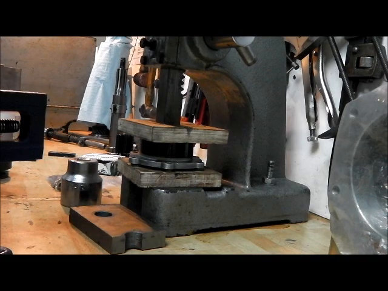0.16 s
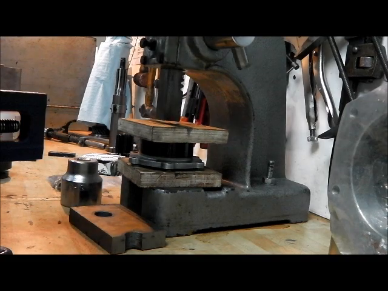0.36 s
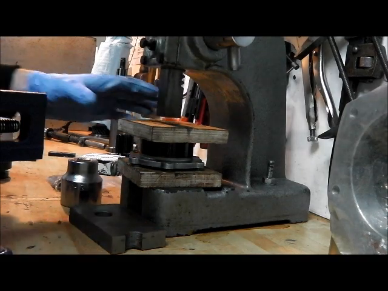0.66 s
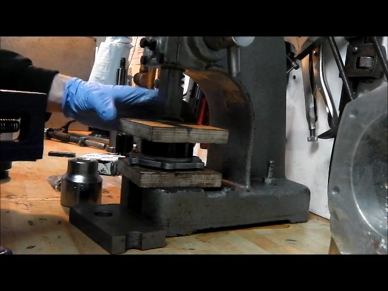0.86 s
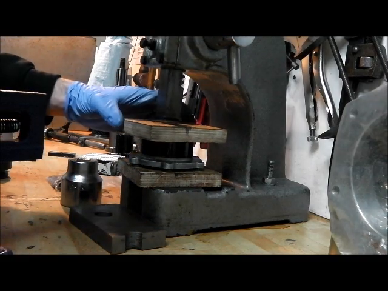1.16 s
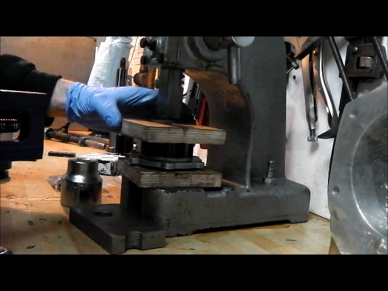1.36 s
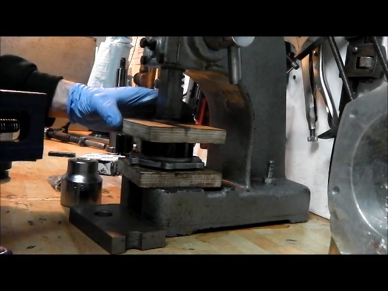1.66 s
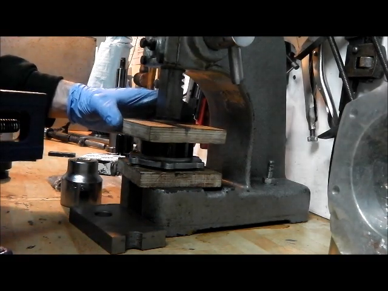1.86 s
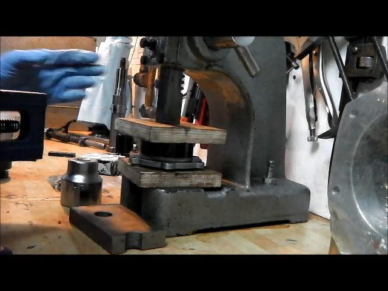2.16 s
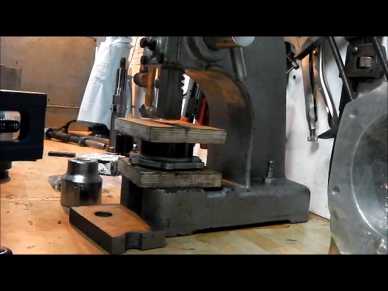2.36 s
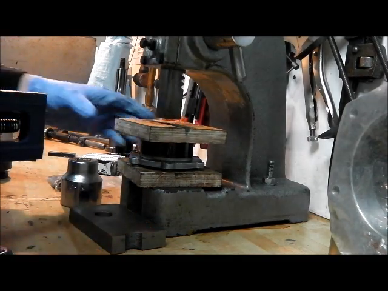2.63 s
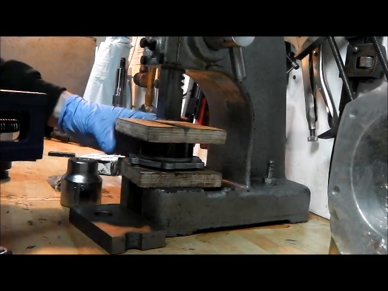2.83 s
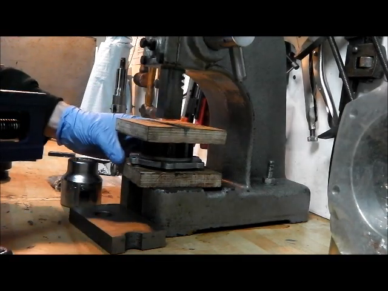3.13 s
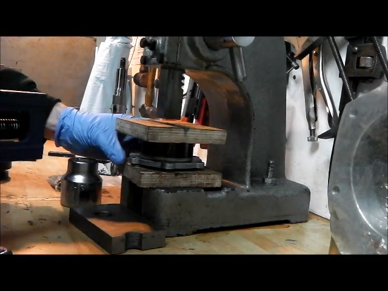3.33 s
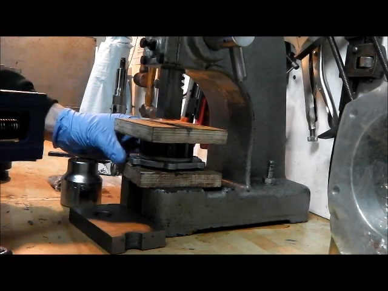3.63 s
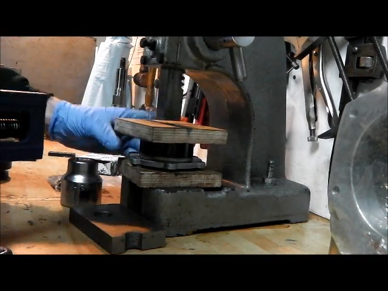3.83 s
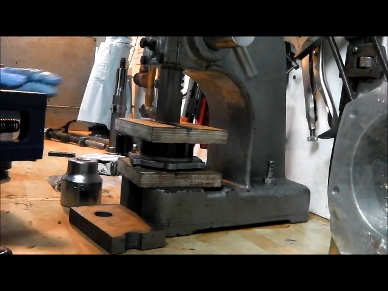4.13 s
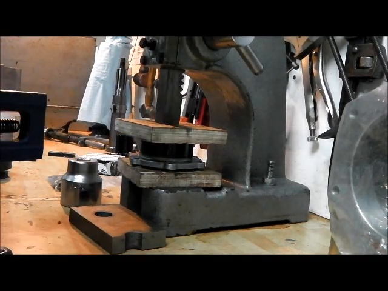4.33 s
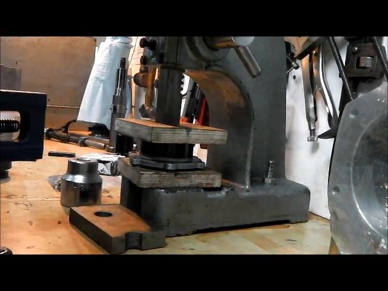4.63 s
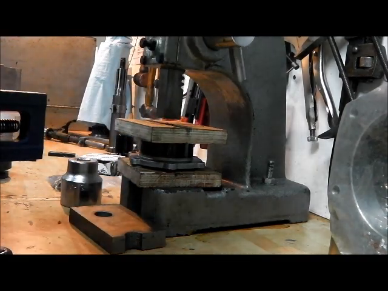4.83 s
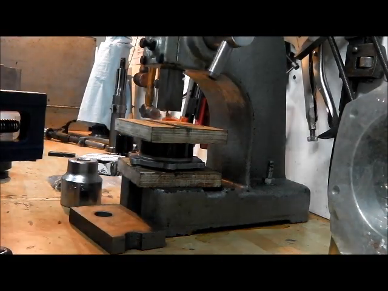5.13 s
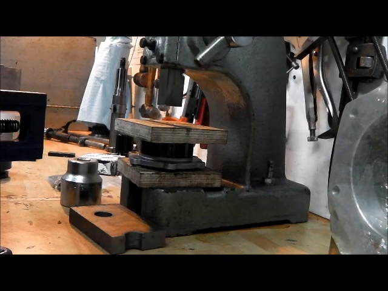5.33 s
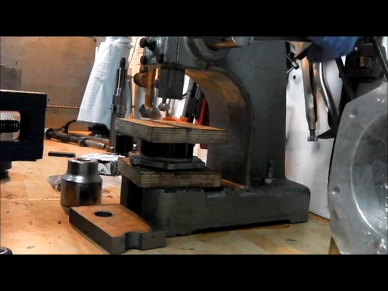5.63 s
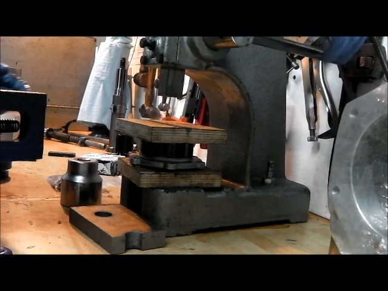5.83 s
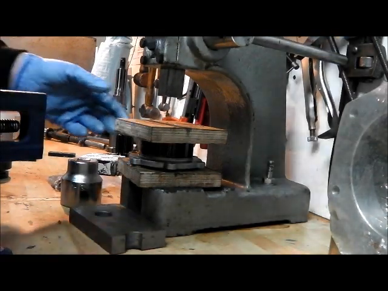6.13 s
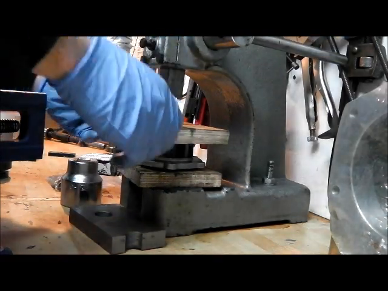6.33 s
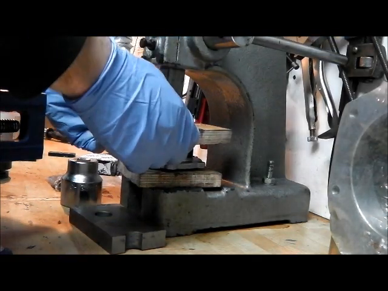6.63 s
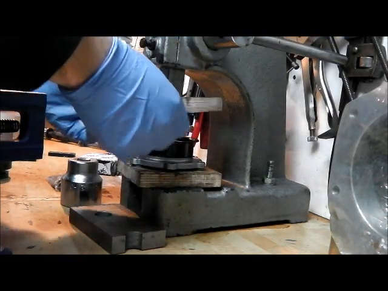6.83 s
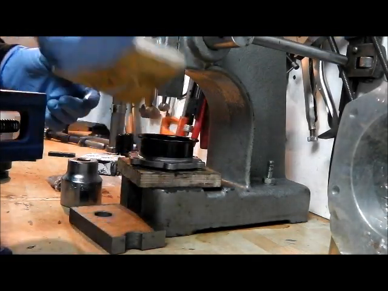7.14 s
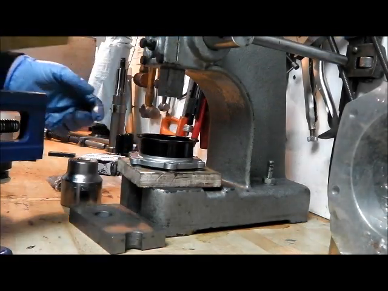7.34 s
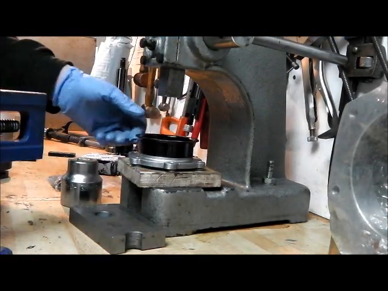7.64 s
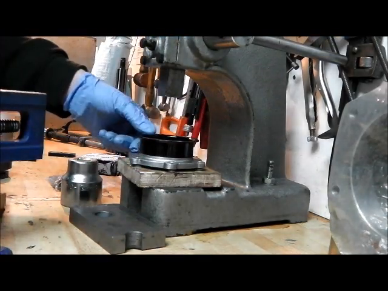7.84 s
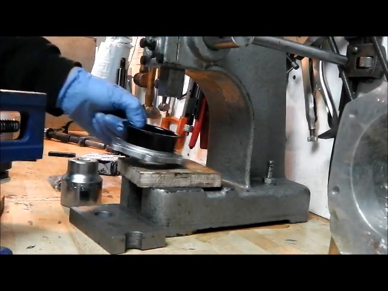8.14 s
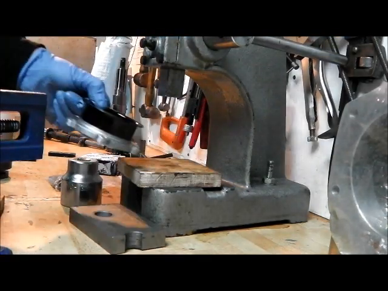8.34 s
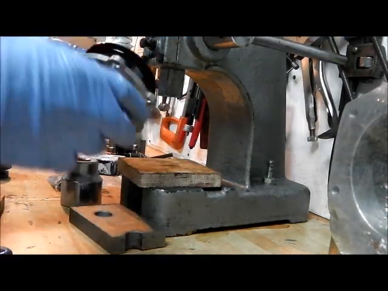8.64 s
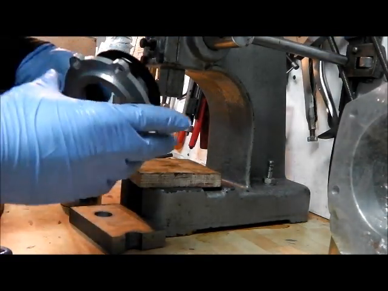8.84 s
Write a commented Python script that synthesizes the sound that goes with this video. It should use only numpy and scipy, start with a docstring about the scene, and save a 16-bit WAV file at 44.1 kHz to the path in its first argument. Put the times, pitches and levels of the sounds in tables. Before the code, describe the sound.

A close stereo pickup in a small workshop, with steady soft hiss and short echoes. Glove rustle opens; at 0.3-0.4 s wooden knocks clunk with a little frame hum. Low scrapes and dull knocks follow around 0.9-1.8 s. At 2.1-2.5 s light ticks build to a loud hard knock at 2.3 s. Then it is nearly quiet, with faint dull ticks to the right and tiny scrapes. A knock at 4.0 s precedes a dense crack of blows and a bright steel snap at 4.25 s. From 4.3 to 6 s gears grind unevenly, clunks ring at 4.8, 5.05 and 5.5 s, and soft tool taps run to 6.2 s. Faint scraping and rustling lead to a loud woody clonk at 6.93 s. After a lull, a scrape and knock at 7.8 s start a rapid, hard, higher clatter at 7.93-8.1 s, fading into rustle and hiss.

```python
"""Hand press on a wooden bench

Blows on wooden blocks excite damped modes of stack and bench; the cast frame rings on after some of them.
The ram lets go with a steel snap; friction noise drives the scrapes and the grinding rack and pinion.
A hanging tool taps softly, and gloves and sleeves rustle as filtered noise.
Short diffuse echoes of a small workshop follow, over steady shaped background hiss in both channels."""
import sys
import numpy as np
from scipy import signal
from scipy.fft import rfft, irfft, next_fast_len
from scipy.io import wavfile
from scipy.ndimage import uniform_filter1d

SR = 44100
rng = np.random.default_rng(int(sys.argv[2]) if len(sys.argv) > 2 else 0)


def store_wav(level_fs):
    """Save 16-bit WAV to argv[1]."""
    pcm = np.round(np.clip(np.atleast_2d(level_fs), -1, 1) * 32767)
    wavfile.write(sys.argv[1], SR, pcm.T.astype(np.int16))


N = 396438

# Blows on the wooden stack: start_s, peak_db, colour_hz, thud_db, crack_db, frame_hum_db
# The last three are drive levels relative to peak_db; a hum of -45 or less means the frame stays silent.
BLOWS = [(0.256, -36.5, 748, -6, -30, -60), (0.265, -31, 470, -17, -37, -60), (0.3, -42, 875, -4, -13, -60),
         (0.329, -14.5, 520, -17, -16.5, -64), (0.405, -16, 740, -19, -26.5, -14.5),
         (0.591, -50.5, 398, 4, -9, -60), (0.911, -32.5, 408, -6, -22, -60),
         (0.945, -34, 509, -12, -17, -60), (0.991, -20, 515, -22, -27, -60),
         (1.598, -23, 462, -17, -45, -60), (2.095, -38.5, 400, -9, -25, -60),
         (2.156, -33, 700, -25, -39, -14), (2.215, -42, 778, -16, -26, -8),
         (2.258, -36, 890, -7, -30, -5.5), (2.295, -22.5, 694, -9, -27, -60),
         (2.323, -6, 610, -39, -12.5, -16.5), (2.369, -13, 766, -20.5, -31, -42.5),
         (2.482, -35, 736, -4, -29, -13.5), (3.991, -16, 560, -46, -35, -60),
         (4.212, -23, 727, -15, -23, -60), (4.227, -12.5, 750, -28, -9, -60),
         (4.235, -6.5, 694, -15.5, -11.5, -60), (4.252, -7, 460, -13, -4.5, -60),
         (4.265, -10, 480, -9, -33, -60), (4.516, -35, 480, -19, -24, -60),
         (4.741, -26, 541, -14, -38, -60), (4.76, -18.5, 720, -31, -13.5, -12.5),
         (4.828, -12, 790, -24, -22.5, -30), (4.928, -26, 750, -28, -32, -12.5),
         (5.036, -11.5, 760, -12, -26, -6), (5.056, -22.5, 770, -30, -17.5, -12),
         (5.137, -28.5, 766, -9, -41, -3.5), (5.282, -49, 1320, -23, -5, -60),
         (5.499, -16, 757, -10, -26.5, -12), (5.509, -17, 690, -23, -36, -60),
         (5.529, -20, 510, -8, -23, -20), (5.647, -26.5, 407, -8, -41, -20),
         (5.739, -23, 660, -9, -32, -10.5), (5.898, -27, 396.5, -8, -14.5, -60),
         (6.711, -26, 550, -18, -42, -58), (6.933, -1, 1030, -19, -29, -22.5),
         (7.805, -8.5, 624, -15, -26, -64), (7.934, -4.5, 840, -40, -28.5, -60),
         (7.956, -4.5, 980, -28, -33.5, -58), (8.021, -2, 1140, -25, -23, -18.5),
         (8.037, -0.5, 874, -15, -20.5, -60), (8.046, -2, 970, -44.5, -19, -60),
         (8.074, -5.5, 930, -40, -20, -60), (8.083, 0, 890, -50, -16.5, -17),
         (8.114, -6.5, 895, -22.5, -20.5, -28)]
# Faint dull ticks off to the right: start_s, peak_db, colour_hz
TICKS = [(2.709, -57, 363), (2.975, -45, 487), (3.209, -49, 480), (3.374, -51.5, 571), (5.86, -45, 360),
         (7.494, -45, 477), (8.513, -51, 860)]
# Steel on steel: start_s, peak_db, left_minus_right_db (for the part below SNAP_SPLIT_HZ)
SNAPS = [(0.2673, -30, 5), (0.328, -31, 6), (2.3231, -30, -4), (4.226, -29, 9), (4.234, -17, 9),
         (4.2531, 4, 13.5), (4.7596, -49, 2), (7.955, -27, 6), (8.0233, -26, -3), (8.0865, -38, 2)]
# Blocks dragged over each other, one swell of scraping a row; long strokes take overlapping rows:
# start_s, loudest_s, end_s, level_db, colour_hz, hardness_db
SCRAPES = [(0.748, 0.779, .84, -50.5, 650, 2), (0.882, 0.937, 1.0, -32, 456, 9),
           (0.982, 1.0, 1.09, -28.5, 410, 15.5), (1.23, 1.239, 1.33, -32.5, 480, -5),
           (1.25, 1.33, 1.36, -29.5, 490, 2.5), (1.45, 1.536, 1.62, -38, 515, -0.5),
           (1.658, 1.752, 1.79, -39, 400, 7.5), (2.48, 2.515, 2.57, -55, 670, 5),
           (2.83, 2.9, 2.96, -53.5, 487, 0), (3.506, 3.55, 3.6, -57, 950, 16),
           (3.583, 3.628, 3.7, -52.5, 950, 5), (5.44, 5.466, 5.51, -37, 550, 10),
           (6.192, 6.303, 6.45, -48.5, 1090, 2.5), (6.38, 6.451, 6.5, -46, 482.4, 20),
           (6.634, 6.688, 6.76, -46.5, 480, 6), (6.53, 6.558, 6.66, -40.5, 444, 7),
           (7.389, 7.412, 7.48, -50, 609, 1), (7.824, 7.805, 7.85, -22, 583, 3)]
# Rack and pinion turning under load, one table a pull: time_s, grind_db, bench_rumble_db
PULLS = [
    [(0.2, -63.5, -63), (0.32, -42.5, -59), (0.424, -56, -47), (0.7, -68, -87)],
    [(1.95, -64, -58), (2.13, -56, -60), (2.316, -50, -52), (2.6, -65, -68)],
    [(4.27, -37.5, -39), (4.398, -41, -44), (4.872, -52.5, -43.5), (4.978, -49.5, -48), (5.216, -54.5, -60),
     (5.408, -50, -58), (5.65, -47.5, -49), (6.01, -64, -63.5), (6.2, -61.5, -78)],
    [(6.55, -71, -59), (6.76, -56, -70), (6.85, -84, -81)],
    [(7.8, -41.5, -67), (8.002, -56, -48), (8.216, -59.5, -58.5), (8.35, -58, -74)],
]
# Taps of a hanging tool: start_s, peak_db
TAPS = [(4.4247, -37.5), (4.5984, -48), (4.9651, -57), (5.2844, -42), (5.5947, -58), (5.684, -45),
        (5.7714, -53), (5.8531, -48), (5.944, -47), (6.0227, -46.5), (6.101, -49.5), (6.1686, -48)]
# Gloves and cloth, one movement a row: start_s, loudest_s, end_s, level_db, top_end_db (relative to level_db)
RUSTLES = [(0.0, 0.037, 0.13, -41.5, 2.5), (0.12, 0.288, 0.29, -51, 1), (1.89, 2.005, 2.08, -60, -10),
           (2.807, 2.864, 2.88, -52.5, -4), (3.952, 3.986, 3.995, -49, -6.5),
           (4.397, 4.407, 4.43, -44, -17), (4.95, 5.016, 5.23, -55.5, -3), (5.16, 5.172, 5.28, -54.5, -13),
           (5.375, 5.407, 5.68, -47.5, -7.5), (5.877, 5.88, 6.14, -57, -3),
           (6.146, 6.346, 6.59, -52, -10.5), (6.797, 6.91, 7.13, -56, -2.5), (7.09, 7.16, 7.13, -57, -9),
           (7.447, 7.727, 7.73, -54, -8), (7.788, 7.838, 8.04, -42.5, -10.5), (8.15, 8.27, 8.42, -53, -2.5)]
# Modes of the wooden stack, before the extra damping of each contact: pitch_hz, level_db, t60_s
WOOD_MODES = [(224, 1.5, 0.95), (351, -6.5, 0.28), (426, 6, 0.13), (459.5, 1, 0.065), (536, -3, 0.2),
              (573, -3.5, 0.077), (586, 0.5, 0.091), (728, 2.5, 0.064), (882, 5.5, 0.027),
              (956, -8.5, 0.28), (1036, -10.5, 0.37), (1102, -8, 0.17), (1247, -3, 0.067),
              (1366, -2, 0.045), (1577, -2, 0.098), (1740, -4, 0.047), (2098, -2, 0.037), (2079, -8, 0.33),
              (2790, -16, 0.24), (3030, -21, 0.21), (2387, -6.5, 0.13), (3250, -14, 0.069), (3830, -12, .1),
              (4500, -11.5, .09)]
# Modes of the cast frame, lowest first: pitch_hz, level_db, t60_s
FRAME_MODES = [(776, 2.5, 0.26), (1577, -24, 0.34), (1638, -13.5, 0.1), (2214, -18, 0.16),
               (2800, -7.5, 0.043), (3444, -39.5, 0.17), (3970, -37, 0.17), (4480, -25, .06)]
# Modes of the bench, lowest first: pitch_hz, level_db, t60_s
BENCH_MODES = [(44.4, -16, 0.25), (78.1, -5, 0.3), (95, -3.5, .3), (135.5, 1, 0.15), (208, 2, 0.11)]
# Modes of the ram: pitch_hz, level_db, t60_s (held to at least 0.004 s by decay)
STEEL_MODES = [(2910, -5.5, 0.033), (4130, -19, 0.019), (6400, 3, 0.0061), (8200, -10, 0.0022),
               (9900, 4, 0.0064), (13500, -5.5, 0.0036)]
# Modes of the hanging tool: pitch_hz, level_db, t60_s
TOOL_MODES = [(775, 9.2, .12), (1348, 11, 0.093)]
# Spectrum of the hiss, relative, with a narrow dip near 7.8 kHz: pitch_hz, level_db (per Hz)
HISS_SPECTRUM = [(15, -72), (25, -11.5), (137, 0.5), (175, -9), (451, -2), (489, -2.5), (607, -3.5),
                 (887, -6.5), (1330, -9.5), (3160, -12), (6800, -14.5), (7800, -24.5), (9000, -16.5),
                 (16000, -21)]

BLOW_FALL_DB, BLOW_HARD_DB = 7, 2.5  # dB per octave squared away from the colour; extra dB above 1050 Hz
BODY_T60_S, CHATTER_T60_S = 0.0336, 0.147
BLOW_PAN_DB, BLOW_PAN_SPREAD_DB = -0.3, 2.8
# At REFERENCE_CRACK_DB a blow is neither softened nor brightened.
REFERENCE_CRACK_DB = -20.5
SOFT_HZ, SOFT_SHARE = 1850, 0.9  # above SOFT_HZ: dB of drive per dB of crack
OVERTONES_DB, OVERTONE_SHARE = -10, 0.8  # at the reference crack; dB of frame overtones per dB of crack
TICK_THUD_DB, TICK_CRACK_DB, TICK_PAN_DB = -5.5, -15, -27.5
TICK_BOUNCE_S, TICK_BOUNCE_DB = 0.0062, -9.5
SNAP_SPLIT_HZ, SNAP_TOP_PAN_DB, SNAP_TAIL_DB = 8000, -9, -32.5  # the top arrives from the right
SCRAPE_SWELL_DB, RUSTLE_SWELL_DB = 13.5, 14.5  # rise from start to loudest moment, and fall to the end
SCRAPE_FALL_DB, SCRAPE_LOW_HZ = 8, 130  # fall in dB per octave squared
RASP_DB, RASP_HZ = -33.5, (3070, 3580)
RACK_HZ, RACK_FALL_DB = 600, 0.5  # fall in dB per octave squared
RUMBLE_TILT_DB = -6.5  # dB per octave above the lowest bench mode
ROOM_T60_S, ROOM_TREBLE_T60_S, ROOM_DB, ROOM_DULL_HZ = 0.13, 0.0364, -14, 4920
HISS_DB, HISS_SIDE_DB = -57.5, 3.5  # rms; side relative to middle
TOP_HZ = 15900


def knocks():
    """Impact excitation: blows on the stack, each a little to one side, and ticks that bounce once."""
    out, t = np.zeros((2, N)), time_axis(ms=300)
    wood = rings(WOOD_MODES, t)
    bench = rings(BENCH_MODES, t) * (1 - decay(t, 0.3)[::-1])  # faded to zero at the end
    for s, db, hz, thud_db, crack_db, _ in BLOWS:
        pan_db = BLOW_PAN_DB + BLOW_PAN_SPREAD_DB * rng.standard_normal()
        add(out, s, blow(wood, bench, db, hz, thud_db, crack_db, pan_db))
    for s, db, hz in TICKS:
        for late_s, less_db in (0, 0), (TICK_BOUNCE_S, TICK_BOUNCE_DB):
            tick = blow(wood, bench, db + less_db, hz, TICK_THUD_DB, TICK_CRACK_DB, TICK_PAN_DB)
            add(out, s + late_s, tick)
    return out


def blow(wood, bench, db, hz, thud_db, crack_db, pan_db):
    """Modal superposition: wood near the blow's colour, chattering loose parts, bench thud, splintery crack."""
    t = time_axis(ms=300)
    contact = np.sin(np.pi / 2 * np.minimum(t / 0.001, 1)) ** 2
    modes_hz = np.transpose(WOOD_MODES)[0]
    # A blow with little crack drives the high modes less.
    soft = undb(SOFT_SHARE * (crack_db - REFERENCE_CRACK_DB) * (modes_hz > SOFT_HZ))
    drive = soft * near(modes_hz, hz, BLOW_FALL_DB, BLOW_HARD_DB)
    body = contact * strike(wood, 2.7, drive) * decay(t, BODY_T60_S)
    chatter = undb(-29.5) * rng.standard_normal(len(t)) * decay(t, CHATTER_T60_S)
    body = body + signal.fftconvolve(body, chatter)[:len(t)]
    body = pan(body / np.abs(body).max(), pan_db, count=1)
    thud = undb(thud_db) * strike(bench, 3.6) * (1 - decay(t, 0.016))
    splinters = band(rng.standard_normal((2, len(t))), 1970, 4390)
    mid, side = splinters * (2.1 * decay(t, 0.041) + 0.41 * decay(t, 0.24))
    crack = undb(crack_db) * (mid + 0.98 * side * np.array([[1], [-1]]))
    return undb(db) * (body + thud + crack)


def clunks():
    """Free vibration of the frame: its lowest mode hums on, most overtones die sooner and follow the crack."""
    out, t = np.zeros((2, N)), time_axis(ms=450)
    frame = rings(FRAME_MODES, t) * (1 - decay(t, 0.0093))
    for s, db, *_, crack_db, hum_db in BLOWS:
        if hum_db > -45:
            overtones_db = OVERTONES_DB + OVERTONE_SHARE * (crack_db - REFERENCE_CRACK_DB)
            sizes = undb(overtones_db + 1.2 * rng.standard_normal(len(FRAME_MODES) - 1))
            ring = undb(hum_db) * frame[0] + sizes @ frame[1:]
            add(out, s, pan(undb(db) * ring, -0.7, count=1))
    return out


def snaps():
    """Stiff impact of the ram: a short bright clang, then a noise-driven rattle in the same resonances."""
    out, t = np.zeros((2, N)), time_axis(ms=200)
    steel = rings(STEEL_MODES, t)
    for s, db, pan_db in SNAPS:
        clang = strike(steel, 1.8)
        rattle = rng.standard_normal((2, len(t))) * decay(t, 0.097)
        tail = signal.fftconvolve(clang[None], rattle)[:, :len(t)]
        low = pan(band(clang, 500, SNAP_SPLIT_HZ), pan_db, count=-3)
        top = pan(band(clang, SNAP_SPLIT_HZ, TOP_HZ), SNAP_TOP_PAN_DB, count=-3)
        add(out, s, undb(db) * (low + top + undb(SNAP_TAIL_DB) * tail))
    return out


def scrapes():
    """Stick-slip friction: wood on wood catches and slips, with a narrow rasp riding on it."""
    out, noise = np.zeros((2, N)), grit(140, 2.24)
    rasp_gain = np.sqrt(SR / 2 / np.ptp(RASP_HZ))  # makes up for the power lost to the narrow band
    for *times, peak_db, hz, hard_db in SCRAPES:
        s, push, (db,) = gated(swell(*times, peak_db, SCRAPE_SWELL_DB), 0.0039, noise)
        wood = rub(undb(db) * push, hz, SCRAPE_FALL_DB, hard_db)
        add(out, s, pan(band(wood, SCRAPE_LOW_HZ, TOP_HZ), -1.8, count=-4))
        add(out, s, band(undb(db + RASP_DB) * push, *RASP_HZ) * rasp_gain)
    return out


def rack():
    """Forced vibration: the gears grind unevenly and the lever's weight shakes the bench."""
    out, t = np.zeros((2, N)), time_axis(ms=200)
    octaves = np.log2(np.transpose(BENCH_MODES)[0] / BENCH_MODES[0][0])
    bench = strike(rings(BENCH_MODES, t) * decay(t, 0.12), 0.56, undb(RUMBLE_TILT_DB * octaves))
    bench = bench / np.linalg.norm(bench)
    noise = np.concatenate([grit(70, 4.0), grit(25, 3.0)])
    for pull in PULLS:
        s, (teeth, shake), (grind_db, rumble_db) = gated(pull, 0.025, noise)
        add(out, s, pan(rub(undb(grind_db) * teeth, RACK_HZ, RACK_FALL_DB), -0.6, count=1))
        add(out, s, signal.fftconvolve(undb(rumble_db) * shake, bench)[None])
    return out


def rub(push, colour_hz, fall_db, bright_db=0):
    """Convolution with a modal response: a rough push drives the wood near its colour, at about its own rms."""
    t = time_axis(ms=80)
    hz = np.transpose(WOOD_MODES)[0][:, None]
    drive = near(hz, colour_hz, fall_db, bright_db) * rng.choice([-1, 1], hz.shape)
    wood = rings(WOOD_MODES, t) * decay(t, 0.051)
    power = np.sum(drive ** 2 * np.sum(wood ** 2, axis=1, keepdims=True), axis=0)
    return signal.fftconvolve(push * drive / np.sqrt(power), wood, axes=1).sum(axis=0)


def taps():
    """Long contact of a swinging tool: soft knocks whose ring swells in."""
    out, t = np.zeros((2, N)), time_axis(ms=150)
    tap = rings(TOOL_MODES, t).sum(axis=0) * (1 - decay(t, 0.021))
    for s, db in TAPS:
        add(out, s, pan(undb(db) * tap / np.abs(tap).max(), -0.56))
    return out


def rustle():
    """Partly coherent friction noise: rubber and cloth rub, a little differently in each channel."""
    out, (mid, side) = np.zeros((2, N)), grit(120, 1.3, channels=2)
    noise = mid + 0.5 * side * np.array([[1], [-1]])
    noise = np.concatenate([unit(band(noise, 1440, 5370)), unit(band(noise, 9000, TOP_HZ))])
    for *times, db, top_db in RUSTLES:
        s, rubbing, (mid_db,) = gated(swell(*times, db, RUSTLE_SWELL_DB), 0.005, noise)
        add(out, s, undb(mid_db) * rubbing[:2] + undb(mid_db + top_db) * rubbing[2:])
    return out


def room(dry):
    """Diffuse reverberation: noise-like echoes of the workshop, duller as they fade."""
    t = time_axis(ms=400)
    noise = rng.standard_normal((2, len(t)))
    low = band(noise, 97, ROOM_DULL_HZ)
    echo = low * decay(t, ROOM_T60_S) + 0.5 * (noise - low) * decay(t, ROOM_TREBLE_T60_S)
    echo = echo * (t > 0.004)
    return undb(ROOM_DB) * signal.oaconvolve(dry.mean(axis=0)[None], echo / np.linalg.norm(echo[0]))[:, :N]


def hiss():
    """Spectral shaping: steady background hiss, with a narrow dip near 7.8 kHz; side louder than middle."""
    hz, db = np.transpose(HISS_SPECTRUM)
    size = next_fast_len(N)
    gain = undb(np.interp(np.log(np.fft.rfftfreq(size, 1 / SR) + 1), np.log(hz), db))
    noise = irfft(rfft(rng.standard_normal((2, size))) * gain, size)[:, :N]
    mid, side = undb(HISS_DB) * unit(noise)
    return mid + undb(HISS_SIDE_DB) * side * np.array([[1], [-1]])


def rings(modes, t):
    """Modal decomposition: one decaying sine per mode, as rows."""
    hz, db, t60 = np.transpose(modes)[:, :, None]
    return undb(db) * np.sin(2 * np.pi * hz * t) * decay(t, t60)


def strike(shapes, scatter_db, weight=1.):
    """Dependence on the striking point: new sign and size for every mode, summed to a peak of 1."""
    chance = rng.standard_normal((2, len(shapes)))
    x = (weight * np.sign(chance[0]) * undb(scatter_db * chance[1])) @ shapes
    return x / np.abs(x).max()


def near(hz, colour_hz, fall_db, bright_db=0):
    """Contact spectrum: drive falls away from the colour; hard contacts add drive above 1050 Hz."""
    return undb(bright_db * (hz > 1050) - fall_db * np.log2(hz / colour_hz) ** 2)


def grit(rate_hz, depth_db, channels=1):
    """Amplitude modulation as grip catches and slips: random levels rate_hz times a second, then smoothed."""
    k = int(SR / rate_hz)
    jumps = uniform_filter1d(rng.standard_normal(N)[np.arange(N) // k], k)
    return unit(undb(depth_db * jumps)) * rng.standard_normal((channels, N))


def swell(start, top, end, db, swell_db):
    """Envelope of one swell: level climbs to its loudest moment, kept between start and end, and sinks."""
    return [(start, db - swell_db), (np.clip(top, start + 0.001, end - 0.001), db), (end, db - swell_db)]


def gated(table, edge_s, noise):
    """Gating of noise over the time span of a table, with soft edges: start time, noise and level curves."""
    s, *columns = np.transpose(table)
    i = np.arange(int(s[0] * SR), int(s[-1] * SR))
    gate = np.clip(np.minimum(i / SR - s[0], s[-1] - i / SR) / edge_s, 0, 1)
    return s[0], gate * noise[:, i], [np.interp(i / SR, s, c) for c in columns]


def decay(t, t60):
    """Exponential damping: 60 dB down after t60 seconds, at least 4 ms."""
    return np.exp(-np.log(1000) * t / np.maximum(t60, 0.004))


def band(x, lo_hz, hi_hz):
    """Band-pass filtering with a Butterworth response."""
    return signal.sosfilt(signal.butter(2, [lo_hz, hi_hz], "band", fs=SR, output="sos"), x)


def pan(x, db, count=0):
    """Level and time differences between channels: left louder by db and later by count samples."""
    left, right = (np.pad(x, (max(int(k), 0), 0))[:len(x)] for k in (count, -count))
    return np.array([undb(db / 2) * left, undb(-db / 2) * right])


def add(out, s, x):
    """Linear superposition: mixes x in at s seconds."""
    i = int(s * SR)
    out[:, i:i + x.shape[1]] += x[:, :N - i]


def undb(db):
    """Decibel law: level to amplitude."""
    return 10 ** (np.asarray(db) / 20)


def unit(x):
    """Power normalisation to an rms of 1."""
    return x / np.sqrt(np.mean(x ** 2))


def time_axis(ms):
    """Uniform sampling: sample times in seconds over ms milliseconds."""
    return np.arange(ms * SR // 1000) / SR


def scene():
    """Superposition of direct sound, reverberation and background noise."""
    work = knocks() + clunks() + snaps() + taps() + scrapes() + rack() + rustle()
    return work + room(work) + hiss()


def record(dry):
    """Saturation and band limiting: the camera rounds the loudest peaks and cuts the top."""
    rounded = np.tanh(0.78 * dry) / 0.8
    return signal.sosfilt(signal.ellip(10, 0.2, 70, TOP_HZ, fs=SR, output="sos"), rounded)


dry = scene()
out = record(dry)
store_wav(out)
```